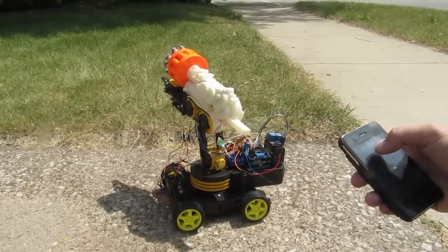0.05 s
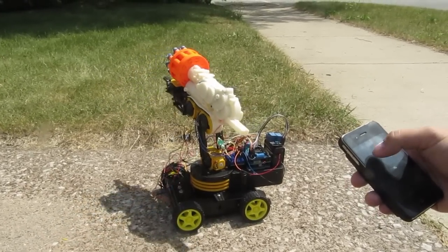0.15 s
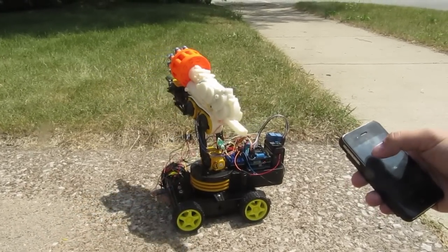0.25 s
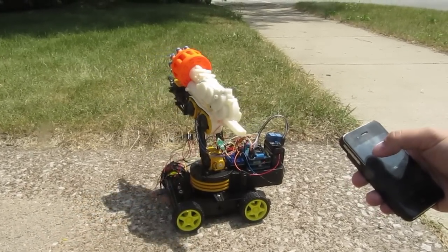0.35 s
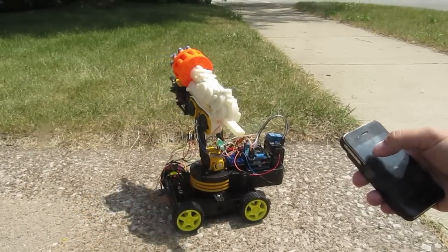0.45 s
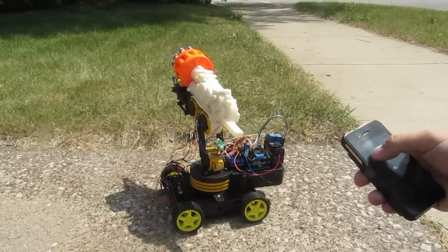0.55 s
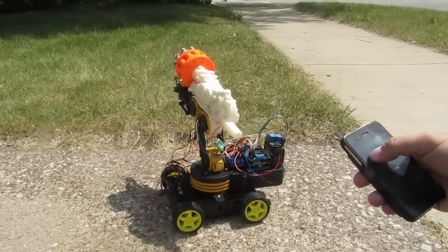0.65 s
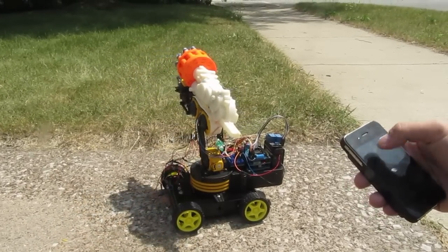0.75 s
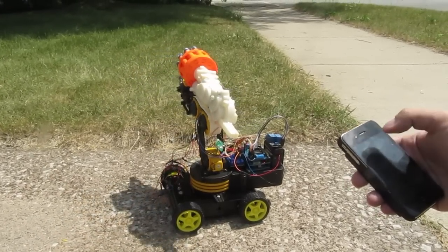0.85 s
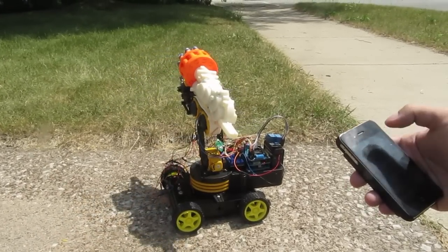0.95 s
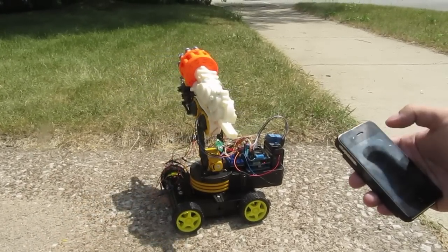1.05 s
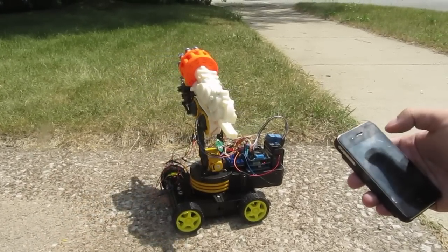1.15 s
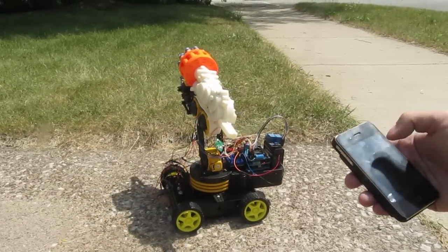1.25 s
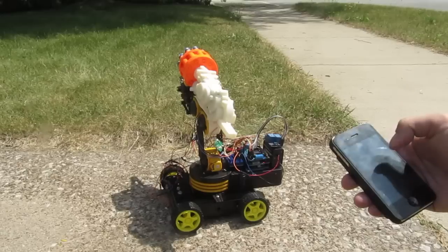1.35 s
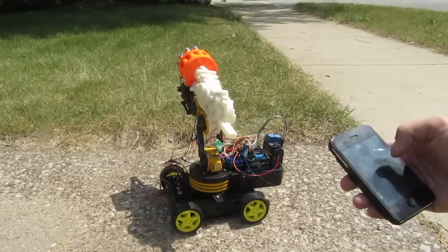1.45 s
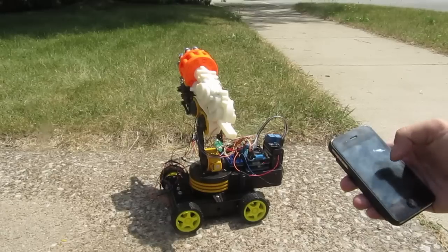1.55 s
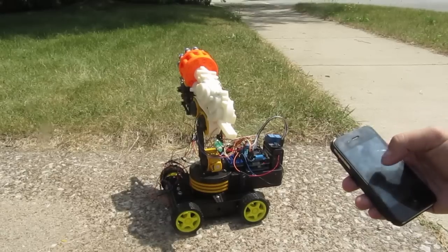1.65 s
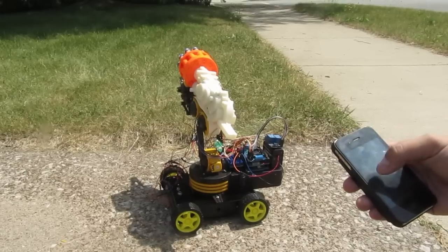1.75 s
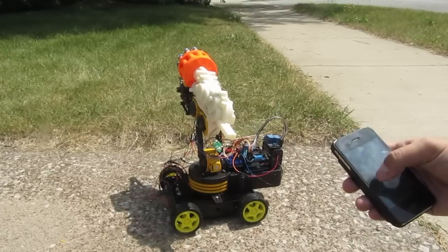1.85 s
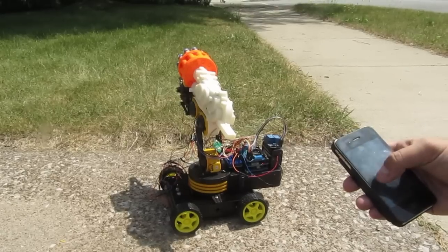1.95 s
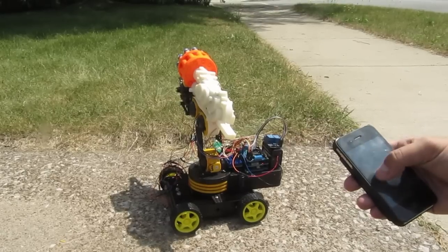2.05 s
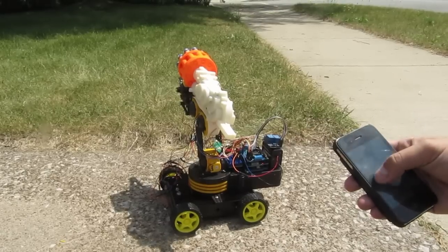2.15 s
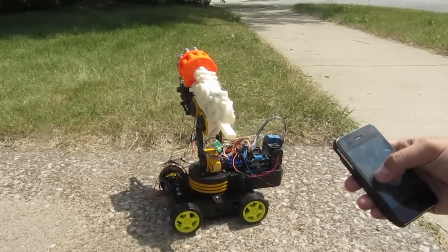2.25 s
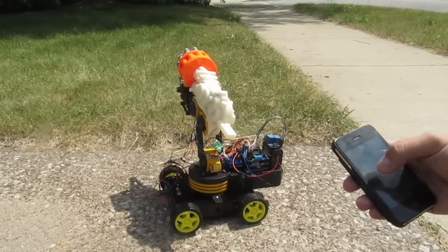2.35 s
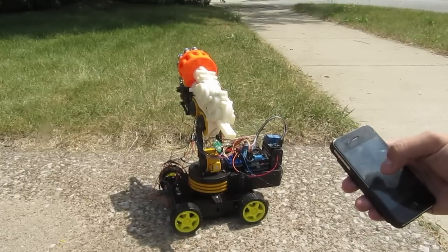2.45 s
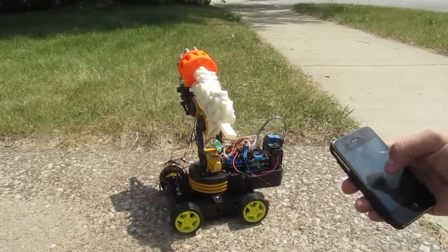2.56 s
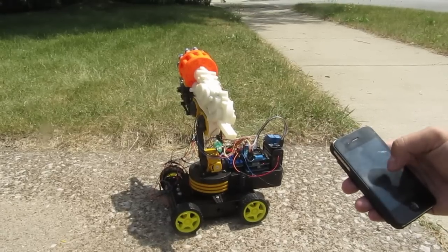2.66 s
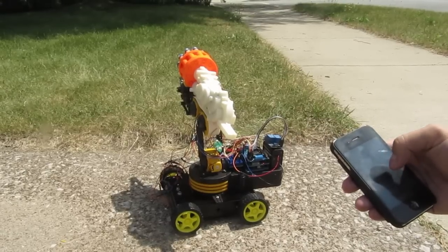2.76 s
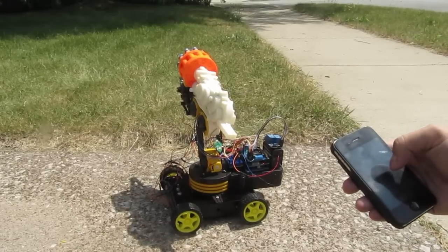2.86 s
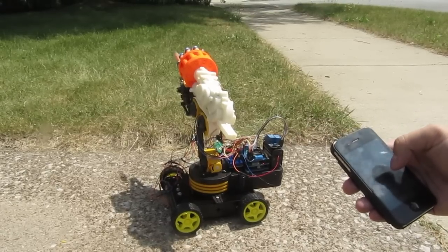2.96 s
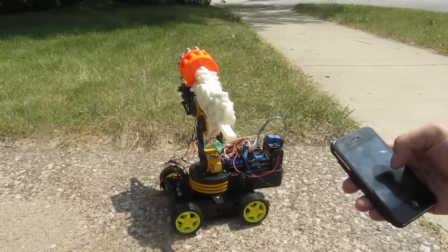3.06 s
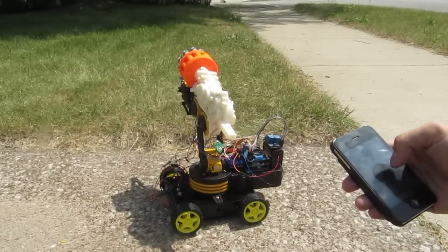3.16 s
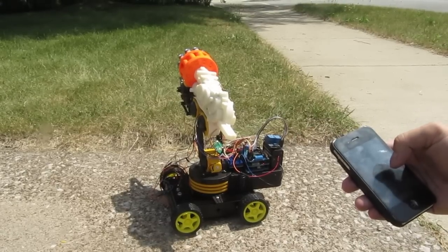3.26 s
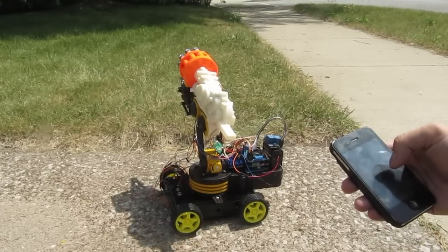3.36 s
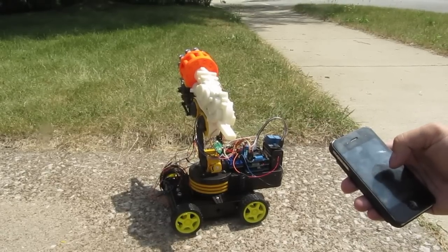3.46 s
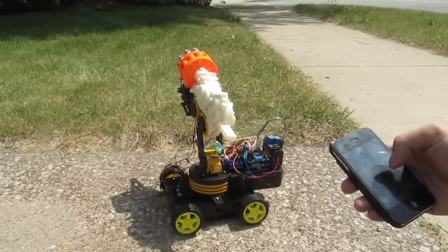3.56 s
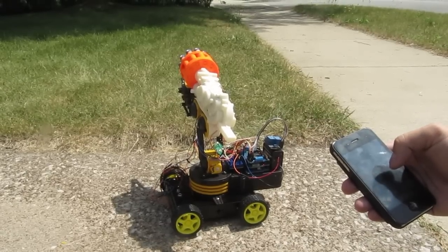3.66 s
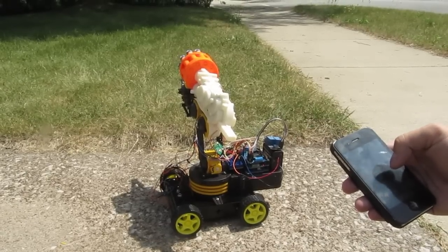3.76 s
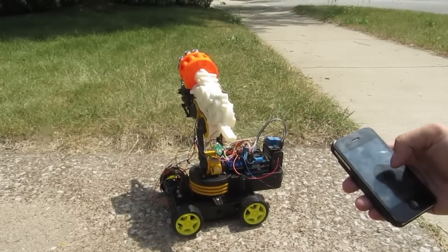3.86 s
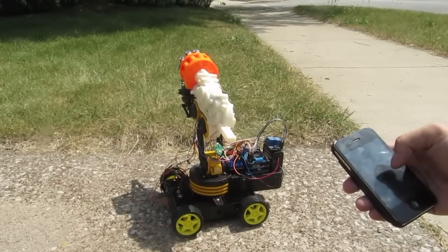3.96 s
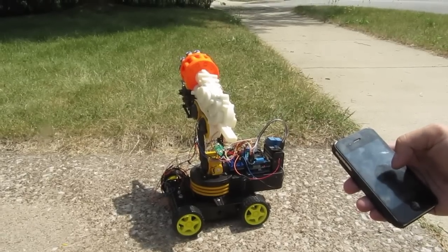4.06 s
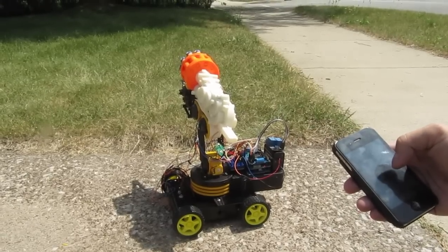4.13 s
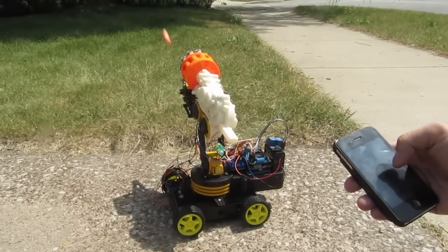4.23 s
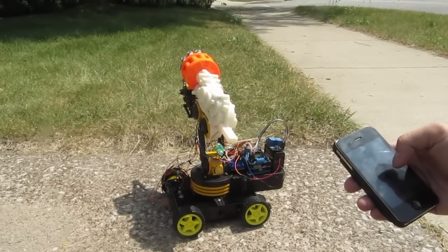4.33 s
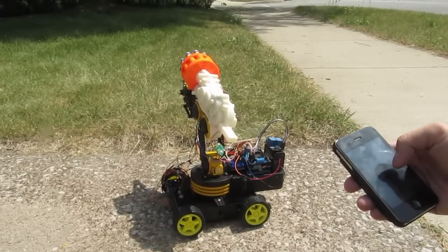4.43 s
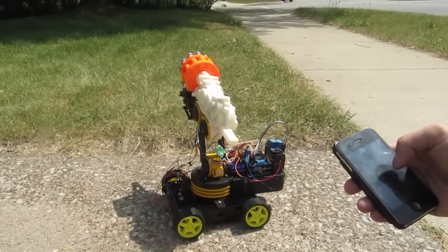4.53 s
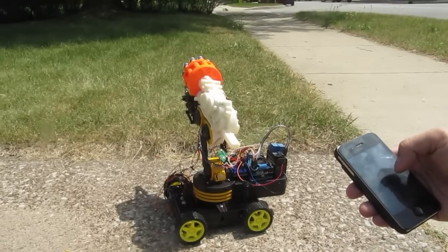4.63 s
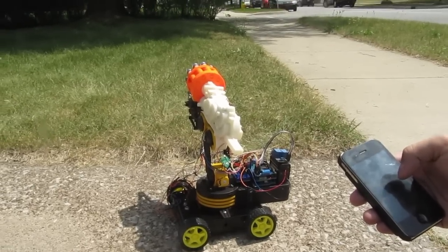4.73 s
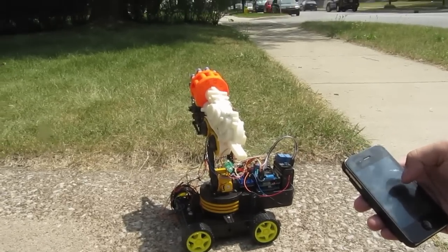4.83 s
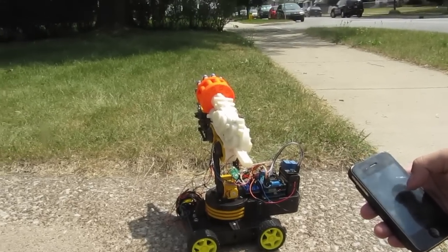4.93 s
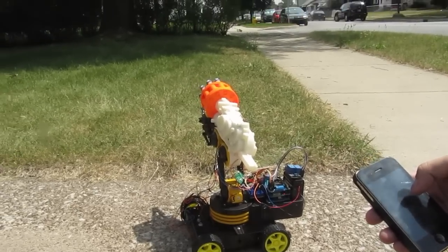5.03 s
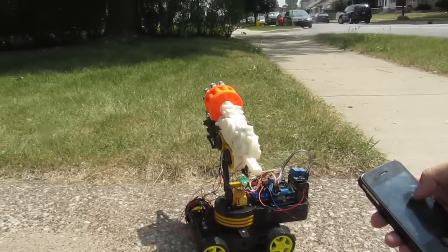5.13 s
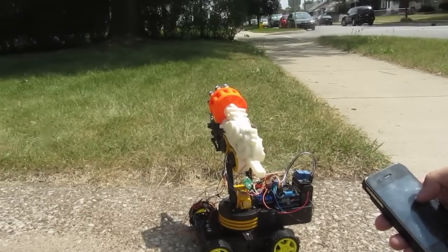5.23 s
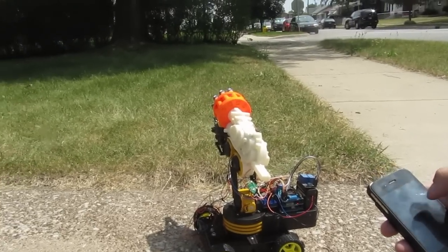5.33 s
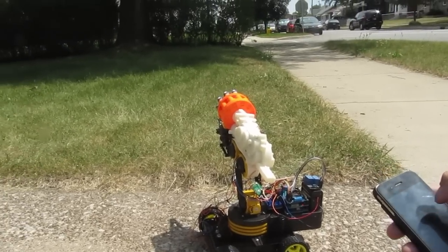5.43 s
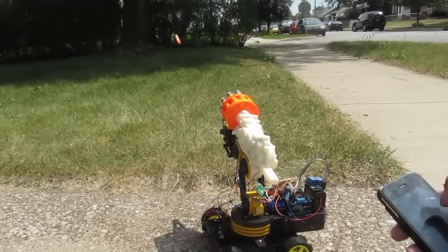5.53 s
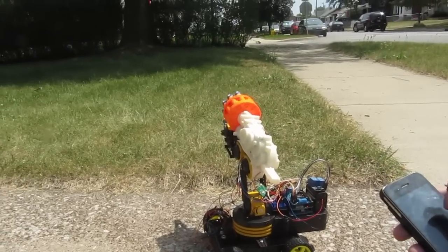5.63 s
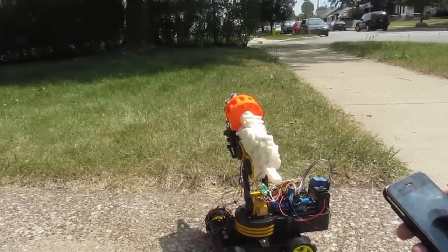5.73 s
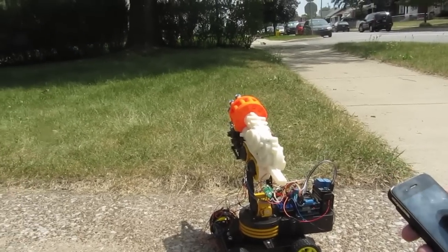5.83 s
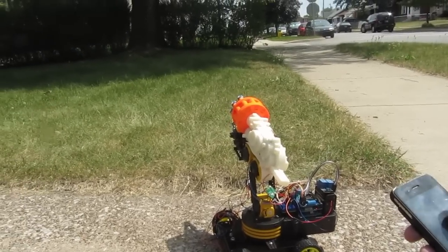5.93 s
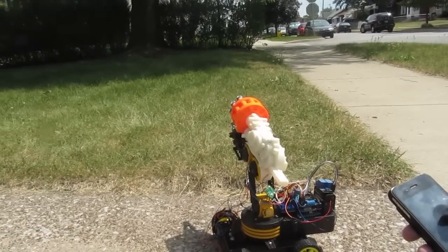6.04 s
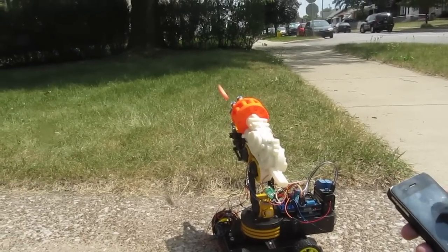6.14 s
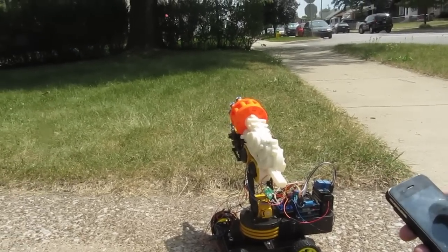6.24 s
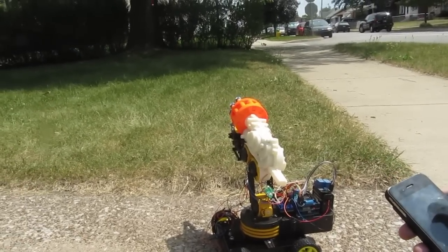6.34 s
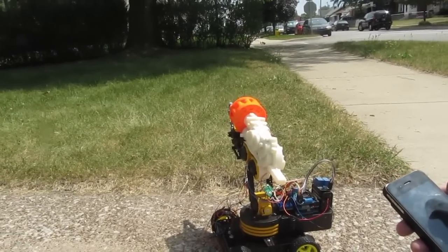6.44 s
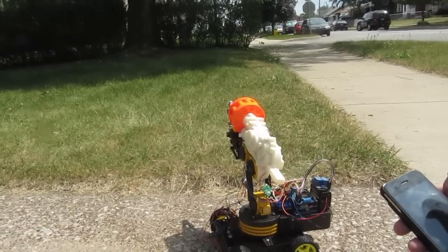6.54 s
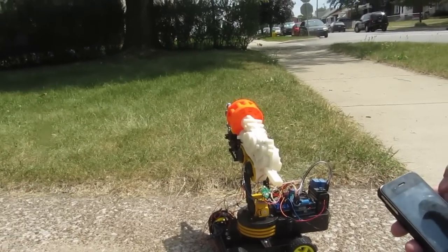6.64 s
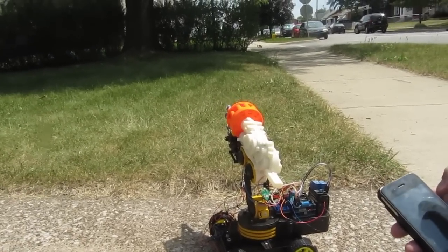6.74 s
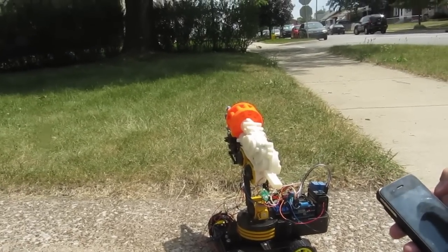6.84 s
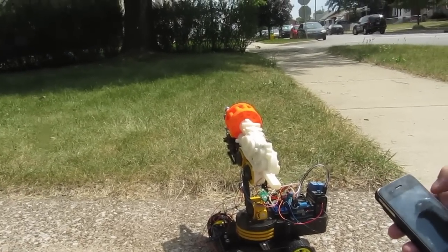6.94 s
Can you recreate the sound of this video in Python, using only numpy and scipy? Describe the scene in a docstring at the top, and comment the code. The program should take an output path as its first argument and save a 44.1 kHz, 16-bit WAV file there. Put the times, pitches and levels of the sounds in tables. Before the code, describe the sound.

Close outdoor mono sound beside a pavement, over a soft, low wash of distant traffic. From 0 to 0.95 seconds a small arm motor gives a steady, raspy, high gear whine; it then loses power, fading and slowing with small loose knocks until about 1.3. Sparrows chirp in short glides and rasps from 1.2 to 2.4, with a light wind puff near 1.85. At 2.46 a switch ticks and a harsher launcher motor climbs rapidly, whining and rattling in its plastic shell. Loud, dry plunger slams land at about 3.0, 3.7, 4.3, 4.9, 5.55 and 6.2, each a double-hit plastic clatter with a tiny rebound. Between them the motor briefly runs freer, then strains, with ratchet ticks. Gain ducks at slams and creeps back. The motor grinds down from 6.2 to 6.8; sparrows chirp at the end.

```python
"""A pavement, with a toy robot on it: a geared arm motor whines and coasts to a stop, then a dart launcher's
motor spins up, winds a spring and lets the plunger slam six times. Motors are lines locked to shaft speed
over coloured noise; slams are decaying noise, ticks are ringing modes. Sparrows are gliding sines, the street
is filtered noise. The camera's gain control ducks at every slam and creeps back."""
import sys
import numpy as np
from scipy import signal
from scipy.fft import rfft, irfft
from scipy.io import wavfile
from scipy.ndimage import uniform_filter1d

SR = 44100
rng = np.random.default_rng(int(sys.argv[2]) if len(sys.argv) > 2 else 0)


def magnitude_from_level(level_db):
    """Linear magnitude for a level in decibels (20 dB per decade)."""
    exponent = np.asarray(level_db, float) / 20
    return 10 ** exponent


def digitize_waveform(pressure):
    """Quantize a signal to 16-bit integers and store it at the path in sys.argv[1].

    Rows of a 2-D input are taken as channels; values are limited to [-1, 1].
    """
    field = np.atleast_2d(pressure).T
    bounded = np.clip(field, -1, 1)
    quanta = np.round(bounded * 32767).astype(np.int16)
    wavfile.write(sys.argv[1], SR, quanta)


N = 308259
SECONDS = np.arange(N) / SR


def rms_one(x):
    """Scales to rms 1."""
    return x / np.sqrt(np.mean(x ** 2) + 1e-20)


def in_time(rows):
    """Interpolates each column over the first, time [s]."""
    s, *columns = np.transpose(rows)
    return [np.interp(SECONDS, s, c) for c in columns]


def at_hz(points, hz):
    """Interpolates (frequency [Hz], level [dB]) over log frequency."""
    points_hz, points_db = np.transpose(points)
    return np.interp(np.log(hz), np.log(points_hz), points_db)


def filtered(x, order, hz, kind):
    """Butterworth filter."""
    return signal.sosfilt(signal.butter(order, hz, kind, fs=SR, output="sos"), x)


def colour(x, spectrum, peaks=()):
    """Weights the spectrum by an outline and bell-shaped resonances; rms 1."""
    hz = np.fft.rfftfreq(N, 1 / SR) + 1
    db = at_hz(spectrum, hz)
    for centre_hz, width_hz, peak_db in peaks:
        db = db + peak_db / (1 + (2 * (hz - centre_hz) / width_hz) ** 2)
    return rms_one(irfft(rfft(x) * magnitude_from_level(db), N))


def dulled(x, split_hz, treble_db):
    """Gentle contacts excite less treble: the part above the split gets its own gain."""
    low = signal.sosfiltfilt(signal.butter(2, split_hz, fs=SR, output="sos"), x)
    return low + magnitude_from_level(treble_db) * (x - low)


def drift(rate_hz):
    """Slow random wander, rms 1: noise through two equal one-pole lowpasses."""
    r = np.exp(-2 * np.pi * rate_hz / SR)
    wander = signal.lfilter([1], [1, -2 * r, r * r], rng.standard_normal(N + SR))
    return rms_one(wander[SR:])   # first second is run-in


def ring(clicks, hz, t60_s):
    """Two-pole resonator: a unit click starts a decaying sine of height 1."""
    r, w = magnitude_from_level(-60 / (t60_s * SR)), 2 * np.pi * hz / SR
    return signal.lfilter([0, np.sin(w)], [1, -2 * r * np.cos(w), r * r], clicks + 1e-18)


def grains(per_s, spread_db):
    """Random clicks of uneven size and either sign."""
    sizes = magnitude_from_level(spread_db * np.minimum(rng.exponential(1, N), 4)) * rng.choice([-1, 1], N)
    return sizes * (rng.random(N) < per_s / SR)


# launcher motor from rest to first slam:
# (time [s], shaft speed [turns/s], load on the gears [0-1], pull of the spring [0-1])
START_UP = [(2.46, 15.0, .2, 0.0), (2.49, 36, .55, 0.0), (2.52, 57, .72, 0.0), (2.55, 78, .8, .1),
            (2.6, 99.5, .88, .2), (2.65, 116, .7, .35), (2.7, 130.3, .85, .6), (2.75, 138.9, .95, .55),
            (2.79, 143.3, .9, .9), (2.83, 145.3, .92, .95), (2.92, 145.6, .92, .99), (3.01, 143.6, .9, .95)]
# free run, then the spring is picked up and wound: (time after slam [s], then as START_UP)
WINDING_STROKE = [(0.07, 160.2, .1, 0.28), (0.12, 166.4, 0.053, .05), (0.153, 167.3, 0.89, 0.44),
                  (0.183, 169.3, 0.28, 0.075), (0.22, 168.2, 0.82, .45), (0.3, 163, 0.66, 0.88),
                  (0.345, 156.6, 0.94, 0.79), (0.39, 149.3, .7, .9), (0.5, 146.4, 0.77, 1),
                  (0.6, 142.7, 0.76, 0.93)]
# power cut, friction stops the gears: columns as START_UP
RUN_DOWN = [(6.121, 145, 0.75, 1), (6.17, 136, 0.69, 0.76), (6.261, 103, .2, .1), (6.33, 99, 0.18, .05),
            (6.408, 92.5, 0.62, 0.047), (6.47, 80.6, .3, .05), (6.53, 69.8, .8, .25), (6.6, 56, .6, .3),
            (6.681, 36.8, .8, .5), (6.74, 21.6, .75, .7), (6.79, 9.8, 0.094, 0.096)]
# lines of 24 teeth, 5 commutator bars, a second gear stage at 7.2: (multiple of shaft speed, relative level [dB])
DOUBLE_TOOTH_LINES = [(47.95, 4.5), (53.1, 5), (42.97, -9.5), (56.5, -26), (72.4, -4.5)]
TOOTH_LINES = [(24.22, 0), (30.2, -11), (18.1, -18.5), (36.4, -12)]
BRUSH_LINES = [(4.94, 2), (10.08, 0.5), (15.1, -7), (20.11, 4.5), (7.19, -6), (21.6, -21.5), (26.45, -1),
               (16.77, -7)]
# rattle outline: (frequency [Hz], relative level [dB])
RATTLE_OUTLINE = [(290, -55), (500, -24), (668, -18), (819, -6), (1400, -4.5), (1570, -5), (1870, -4.5),
                  (2430, 1), (2810, -2), (4210, 1), (4730, -4), (6510, -5.5), (7750, -3), (10500, -11),
                  (16000, -30)]
# plastic shell resonances, also heard in the slams: (frequency [Hz], width [Hz], gain [dB])
SHELL_MODES = [(893, 52, 8.5), (1660, 83, 4), (2470, 95, 2.5), (2890, 120, 5), (3600, 280, 1.5),
               (4180, 77, 4.5), (5100, 100, 5), (6830, 170, 0.5), (7230, 93, -4), (8850, 140, 3.5),
               (9900, 490, 4), (12100, 100, -4.5)]
# how well the shell radiates a steady line: (frequency [Hz], gain [dB])
SHELL_RADIATION = [(500, -30), (720, -8.5), (765, -10.5), (840, 12), (1050, 4), (1200, 1.5), (1450, -6),
                   (1600, 3.5), (2400, 5.5), (2950, -5.5), (3500, 2.5), (3900, -3), (4300, 3.5),
                   (5000, -2.5), (6200, 1), (7750, -6), (8100, -8), (8600, -9), (9800, -15), (10400, -7.5),
                   (10800, -8), (11200, -17), (16000, -25)]
# how each layer answers: (at full load and working speed [dB], lost without load [dB],
# lost with a slack spring [dB], gained per octave of speed [dB])
RATTLE_RESPONSE = (-18.5, 7.5, -1.5, 1.5)
DOUBLE_TOOTH_RESPONSE = (-20, 7.5, 28, 4.5)
TOOTH_RESPONSE = (-20, 53.5, -1, 2.5)
BRUSH_RESPONSE = (-32, 10.5, 7.5, 4.5)
WORKING_TURNS_PER_S = 145
CREEP_TURNS_PER_S = 15.6   # below this all launcher motor sound dies away


def launcher_motion():
    """Joins start-up, one winding stroke after each of the first five slams, and run-down."""
    rows = list(START_UP)
    slam_times_s = [row[0] for row in SLAM_BLOWS[:-1]]
    ends_s = slam_times_s[1:] + [RUN_DOWN[0][0]]
    for slam_s, end_s in zip(slam_times_s, ends_s):
        rows.append((slam_s, *rows[-1][1:]))
        rows += [(slam_s + s, *rest) for s, *rest in WINDING_STROKE if slam_s + s < end_s]
    return rows + list(RUN_DOWN)


def response_db(law, load, pull, octaves):
    """Layer level from gear load, spring pull and shaft speed."""
    full_db, idle_db, slack_db, octave_db = law
    return full_db - idle_db * (1 - load) - slack_db * (1 - pull) + octave_db * octaves


def launcher():
    """Gear and brush lines ride on the shaft speed above a rattle of tooth contacts in the shell."""
    rows = launcher_motion()
    speed, load, pull = in_time(rows)
    octaves = np.log2(speed / WORKING_TURNS_PER_S)
    slow = np.clip(1 - speed / 140, 0, 1)
    turns = np.cumsum(speed * (1 + 0.00098 * drift(30))) / SR

    contacts = rms_one(grains(40 * speed, spread_db=1.5)) + 0.73 * rng.standard_normal(N)
    throb = 1 + 0.037 * np.cos(2 * np.pi * turns) + 0.3 * np.cos(10 * np.pi * turns)
    rattle_db = response_db(RATTLE_RESPONSE, load, pull, octaves)
    rattle = colour(contacts * throb, RATTLE_OUTLINE, SHELL_MODES)
    rattle = dulled(rattle, split_hz=2000, treble_db=0.63 * (rattle_db + 21) - 4.9 * slow)

    # at low speed the teeth bump a shell mode near 2.4 kHz, harder under power
    grind = rms_one(ring(contacts, hz=2370, t60_s=0.013))
    powered = SECONDS < RUN_DOWN[0][0]
    rattle = rattle + 0.75 * slow * (0.49 + 0.63 * powered) * grind
    out = magnitude_from_level(rattle_db + (1.32 + 0.29 * slow) * drift(53)) * rattle

    families = ((DOUBLE_TOOTH_LINES, DOUBLE_TOOTH_RESPONSE), (TOOTH_LINES, TOOTH_RESPONSE),
                (BRUSH_LINES, BRUSH_RESPONSE))
    for lines, law in families:
        family_db = response_db(law, load, pull, octaves)
        for order, line_db in lines:
            flutter_db = 2.4 * drift(20) + 3 * slow * drift(45)   # slow gears mesh unevenly
            radiated_db = at_hz(SHELL_RADIATION, order * speed)
            gain = magnitude_from_level(family_db + line_db + radiated_db + flutter_db)
            out += np.sqrt(2) * gain * np.sin(2 * np.pi * order * turns)

    running = (SECONDS > rows[0][0]) * (SECONDS < rows[-1][0])
    return out * np.clip(speed / CREEP_TURNS_PER_S, 0, 1) ** 4 * running


# plunger slams: (time [s], blow [dB], second blow [dB])
SLAM_BLOWS = [(3.037, 10.5, 9), (3.6635, 11.5, 8), (4.2908, 10, 5), (4.9225, 10.5, 7.5), (5.5535, 11.5, 6),
              (6.1949, 11.5, 7)]
# clatter outline: (frequency [Hz], relative level [dB])
SLAM_OUTLINE = [(59, -45), (100, -11), (564, -16), (1270, -7), (1870, -13.5), (2410, -7), (3180, -5),
                (3940, 0), (4780, -6.5), (10100, -3), (14500, -13), (15500, -43), (16500, -52)]
SECOND_BLOW_S = 0.0087


def slams():
    """Each blow builds within a millisecond to a dense plastic clatter that dies in a few hundredths of a second."""
    blows = np.zeros(N)
    for s, db, second_db in SLAM_BLOWS:
        at = np.round(np.array([s, s + SECOND_BLOW_S]) * SR).astype(int)
        blows[at] = magnitude_from_level([db, second_db])
    crack, body, tail = (signal.lfilter([1], [1, -magnitude_from_level(-60 / (t60_s * SR))], blows)
                         for t60_s in (.012, .045, .25))
    decay = 0.5 * crack + body + magnitude_from_level(-31.5) * tail
    envelope = signal.lfilter([.025], [1, -.975], decay)   # softens the onset
    clatter = envelope * colour(rng.standard_normal(N), SLAM_OUTLINE, SHELL_MODES)
    return filtered(clatter, 2, 130, "high")   # too small to push deep bass


# switch and ratchet ticks: (time [s], strike strength [dB], weight below 5 kHz [dB])
TICK_STRIKES = [(2.462, -7, -18), (3.233, -3, -4), (3.493, 5.5, -14), (3.857, -6, -4), (4.105, 1.5, -10),
                (4.489, -4, -11), (4.733, 3.5, -8), (5.114, -10, 1), (5.361, 3, -7), (5.746, 0.5, -9),
                (5.996, 1.5, -15), (6.317, -22.5, -3), (6.494, -3.5, -13), (6.885, -27.5, 6.5)]
# what a tick rings with: (frequency [Hz], relative level [dB], t60 [s])
TICK_RINGING = [(2450, -6.5, 0.028), (3300, 8, 0.0093), (4100, 6.5, 0.0091), (6220, -3, 0.0055),
                (7540, -6, 0.0063), (9300, 4, 0.016), (10300, 5.5, 0.0071), (10870, -12, 0.024),
                (12000, -26, .005)]
# the plunger rebounds once: (time after slam [s], strike strength [dB], weight below 5 kHz [dB])
PLUNGER_REBOUND = (0.039, -7.5, -4)


def ticks():
    """Every tick strikes the same modes with new strengths; the contact lasts about a millisecond."""
    delay_s, *rebound_strike = PLUNGER_REBOUND
    rebounds = [(row[0] + delay_s, *rebound_strike) for row in SLAM_BLOWS]
    s, strike_db, weight_db = np.transpose(list(TICK_STRIKES) + rebounds)
    at = np.round(s * SR).astype(int)
    out = np.zeros(N)
    chance = rng.normal(0, 1, (len(at), len(TICK_RINGING)))
    contact = rng.standard_normal((len(TICK_RINGING), 40)) * np.hanning(40) / 4
    for k, (hz, mode_db, t60_s) in enumerate(TICK_RINGING):
        clicks = np.zeros(N)
        clicks[at] = magnitude_from_level(strike_db + mode_db - 7.5 + weight_db * (hz < 5000) + 2 * chance[:, k])
        out += ring(np.convolve(clicks, contact[k])[:N], hz, t60_s)
    return filtered(out, 2, 1500, "high")


# arm motor before its coasting decay:
# (time [s], shaft speed [turns/s], gear level [dB], added band near 4.4 kHz [dB])
ARM_MOTION = [(0.0, 185.1, -28, -11.5), (0.08, 185.2, -26, 0), (0.18, 185.7, -28, -9),
              (0.24, 183.9, -26.5, -7.5), (0.41, 184.1, -27, -2.5), (0.57, 185.5, -24, -12),
              (0.62, 187.5, -26.5, -12), (0.79, 187.1, -27.5, -10), (0.9, 187.4, -26, -11.5)]
# gear noise outline: (frequency [Hz], relative level [dB])
ARM_OUTLINE = [(710, -63), (1200, -35), (1890, -27), (2180, -22), (3590, -1), (4500, -10), (5970, -11),
               (9510, -22.5), (12500, -31), (16000, -50)]
# gearbox resonances and dips: (frequency [Hz], width [Hz], gain [dB])
GEARBOX_MODES = [(2150, 67, 6), (3170, 560, 4.5), (3576, 91, 3), (4180, 550, -14.5), (5870, 790, -12),
                 (6760, 1400, -2), (8020, 440, -5), (8960, 310, 9), (11300, 370, 3.5)]
# three-bar commutator hum and one whine: (multiple of shaft speed, mean level [dB])
ARM_HUM = [(3, -54), (6, -53), (9, -65), (12, -50), (19, -40)]
# gear slack knocks as the arm stops: (time [s], strike strength [dB])
SLACK_KNOCKS = [(0.8244, -14.5), (0.9453, -16), (0.9764, -15), (1.0044, -19.5), (1.0405, -18),
                (1.0564, -24), (1.0829, -14), (1.1004, -26), (1.1424, -41), (1.293, -34)]
ARM_OFF_S, ARM_STILL_S = 0.95, 1.6   # power cut; gear noise ends
ARM_SLOWING_S, ARM_FADE_DB_PER_S = 0.98, 75   # coasting: speed time constant, level slope
ARM_TEETH = 10


def arm():
    """Ten teeth knock in a slowly shifting pattern, once per turn; unpowered, the gears knock loosely."""
    speed, level_db, upper_db = in_time(ARM_MOTION)
    coasting_s = np.maximum(SECONDS - ARM_OFF_S, 0)
    speed = speed * np.exp(-coasting_s / ARM_SLOWING_S)
    level_db = level_db - ARM_FADE_DB_PER_S * coasting_s
    driven = np.clip((ARM_OFF_S - SECONDS) / 0.094, 0, 1)
    turns = np.cumsum(speed * (1 + 0.0013 * drift(28))) / SR

    teeth = np.floor(turns * ARM_TEETH).astype(int)
    knock = np.diff(teeth, prepend=0) > 0
    pattern = np.array([0.72 * (k == 0) + 1.4 * drift(7.0) for k in range(ARM_TEETH)])
    strengths = pattern[teeth % ARM_TEETH, np.arange(N)]
    shudder = rng.standard_normal(200) * magnitude_from_level(-60 * np.arange(200) / SR / .003)
    shudder = irfft(np.exp(1j * np.angle(rfft(shudder))))   # flat spectrum, same phases
    whine = rms_one(np.convolve(knock * strengths, shudder)[:N]) * driven

    loose = (1 - driven) * rms_one(grains(900, spread_db=3.5))
    smooth = .62 * rng.standard_normal(N)
    hiss = (smooth + .5 * loose) * (1 + 0.29 * np.cos(2 * np.pi * turns))

    gears = colour(whine + hiss, ARM_OUTLINE, GEARBOX_MODES)
    upper = filtered(whine + hiss, 2, [4050, 4750], "band")
    gears = gears + magnitude_from_level(upper_db) * rms_one(upper)
    gears = gears / np.sqrt(uniform_filter1d(gears ** 2, size=3000) + 1e-6)   # even out, then set the level
    gears = dulled(gears, split_hz=6000, treble_db=-4.0 * (1 - driven)) * magnitude_from_level(level_db)
    hum = sum(magnitude_from_level(db + 2.0 * drift(5.6)) * np.sin(2 * np.pi * order * turns) for order, db in ARM_HUM)
    return gears * (SECONDS < ARM_STILL_S) + np.sqrt(2) * hum * driven + arm_knocks()


def arm_knocks():
    """Slack gears strike three modes; a soft contact swells for a millisecond or two."""
    s, strike_db = np.transpose(SLACK_KNOCKS)
    at = np.round(s * SR).astype(int)
    chance = rng.normal(0, 1, (len(at), 3))
    out = np.zeros(N)
    for k, (hz, mode_db) in enumerate([(2300, -21.5), (3400, -7), (4500, -19.0)]):
        clicks = np.zeros(N)
        clicks[at] = magnitude_from_level(strike_db + mode_db + 2 * chance[:, k])
        swell = ring(clicks, hz, 0.0061) * 0.067
        out += ring(swell, hz, 0.038)
    return out


# sparrow notes: (time [s], length [s], start [Hz], middle [Hz], end [Hz], level [dB])
SPARROW_NOTES = [(1.165, 0.055, 4100, 4100, 4260, -40.5), (1.23, 0.04, 4600, 4720, 4570, -37.5),
                 (1.275, 0.067, 3300, 3280, 3300, -45), (1.507, 0.07, 5200, 4180, 3850, -47),
                 (1.582, 0.027, 7260, 6600, 6000, -57), (1.829, 0.031, 2200, 3230, 3640, -49.5),
                 (1.853, 0.028, 4660, 4470, 4220, -39.5), (1.862, 0.049, 3930, 3350, 2990, -42.5),
                 (1.956, 0.059, 4330, 4280, 4200, -51), (1.993, 0.041, 4010, 3180, 2500, -51),
                 (2.002, 0.025, 5480, 5230, 5100, -47), (2.045, 0.063, 5500, 5300, 5460, -56),
                 (2.06, 0.13, 3600, 4330, 4100, -49), (2.302, 0.041, 3830, 4100, 4130, -50.5),
                 (2.352, 0.069, 2900, 3520, 2950, -51), (6.801, 0.08, 5360, 3540, 2460, -48),
                 (6.927, 0.021, 3880, 4640, 4660, -41), (6.953, 0.017, 5020, 3600, 2820, -46)]
FLAT_RASP, RASP_LOSS_PER_OCTAVE = 0.86, 0.98   # flat notes rasp, wide glides are clear


def sparrows():
    """Gliding whistles, some rasped by fast flutter, with a blur of echoes from the hedge."""
    out, flutter = np.zeros(N), drift(375)
    for s, length_s, start_hz, middle_hz, end_hz, db in SPARROW_NOTES:
        glide_octaves = abs(np.log2(end_hz / start_hz))
        rasp = np.clip(FLAT_RASP - RASP_LOSS_PER_OCTAVE * glide_octaves, 0, 1)
        i = round(s * SR)
        u = np.linspace(0, 1, min(round(length_s * SR), N - i))
        hz = np.polyval(np.polyfit([0, .5, 1], [start_hz, middle_hz, end_hz], deg=2), u)
        phase = 2 * np.pi * np.cumsum(hz) / SR
        envelope = np.sqrt(np.sin(np.pi * u)) * (1 - rasp + rasp * flutter[i:i + len(u)])
        tone = np.sin(phase) + 0.26 * rasp * np.sin(2 * phase)
        out[i:i + len(u)] += np.sqrt(2) * magnitude_from_level(db) * envelope * tone
    echo_s = np.arange(SR // 5) / SR
    hedge = rng.standard_normal(len(echo_s)) * magnitude_from_level(-60 * echo_s / 0.37)
    return out + magnitude_from_level(-32.5) * signal.fftconvolve(out, hedge)[:N]


# street outline: (frequency [Hz], relative level [dB])
STREET_OUTLINE = [(12, -55), (20, -14), (139, -3), (616, -21.5), (794, -19.5), (1180, -22.5), (1950, -27.5),
                  (2120, -28.5), (2310, -28), (2810, -30), (3420, -29.5), (4790, -34.5), (7730, -37.5),
                  (15200, -50), (16500, -85)]
# traffic drone resonance: (frequency [Hz], width [Hz], gain [dB])
DRONE = [(112.4, 35, 4)]
# wind on the microphone: (time [s], length [s], level [dB])
WIND_PUFFS = [(1.851, 0.03, -28.5), (1.94, 0.11, -40.5)]
STREET_DB = -40


def street():
    """Far traffic as coloured noise that wavers a little, and puffs of wind as 25-90 Hz noise."""
    traffic = colour(rng.standard_normal(N), STREET_OUTLINE, DRONE)
    out = magnitude_from_level(STREET_DB + 0.42 * drift(1.6)) * traffic
    lumps = rms_one(filtered(rng.standard_normal(N), 2, [25, 90], "band"))
    for s, length_s, db in WIND_PUFFS:
        out += magnitude_from_level(db) * lumps * np.exp(-(2 * (SECONDS - s) / length_s) ** 2)
    return out


def scene():
    """Sums all sources to one channel."""
    return (launcher() + slams() + ticks() + arm() + sparrows() + street())[None]


def band_limit(x):
    """A steep low-pass at the top of the band."""
    return signal.sosfilt(signal.butter(12, 16810, fs=SR, output="sos"), x)


def record(dry):
    """Gain control: grabs loud sound in milliseconds, lets go at a steady rate; soft clip, top cut."""
    threshold_db, release_db_per_s, slope = -20.5, 16, 0.84
    level_db = 10 * np.log10(signal.lfilter([.012], [1, -.988], dry[0] ** 2) + 1e-12)
    fall_db = release_db_per_s * SECONDS
    held_db = np.maximum.accumulate(level_db + fall_db) - fall_db
    cut_db = slope * np.maximum(held_db - threshold_db, 0)
    cut_db = signal.lfilter([.08], [1, -.92], cut_db)   # smooths the gain
    out = 0.8 * np.tanh(dry * magnitude_from_level(-cut_db) / 0.73)
    out = filtered(out, 8, 15800, "low")
    return band_limit(out)


dry = scene()
out = record(dry)
digitize_waveform(out)
```